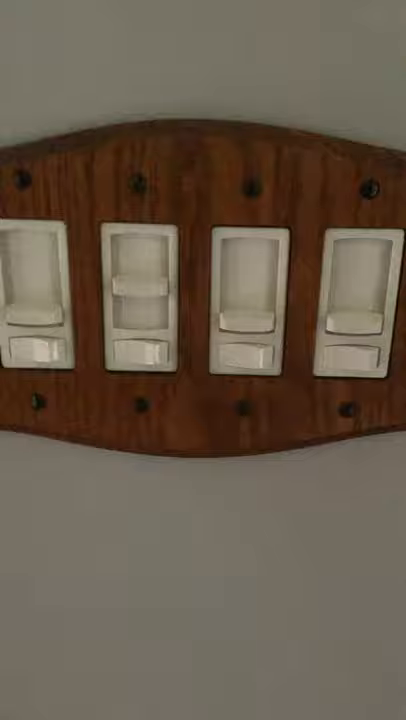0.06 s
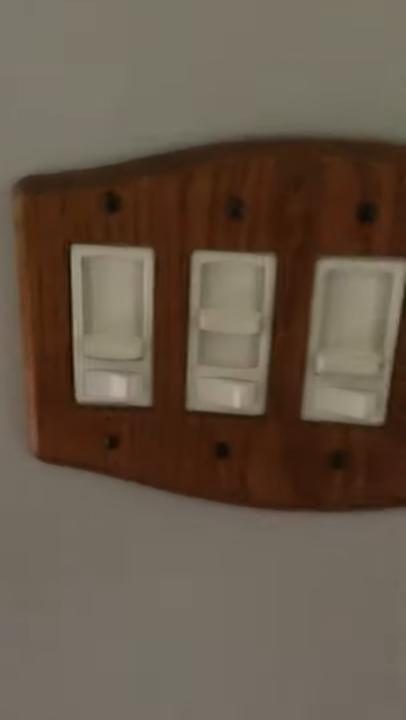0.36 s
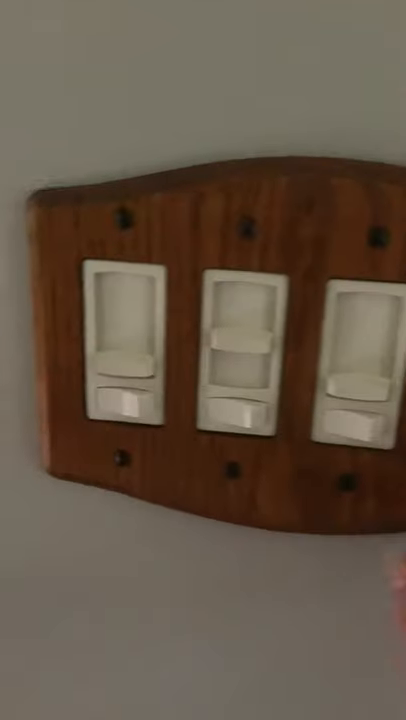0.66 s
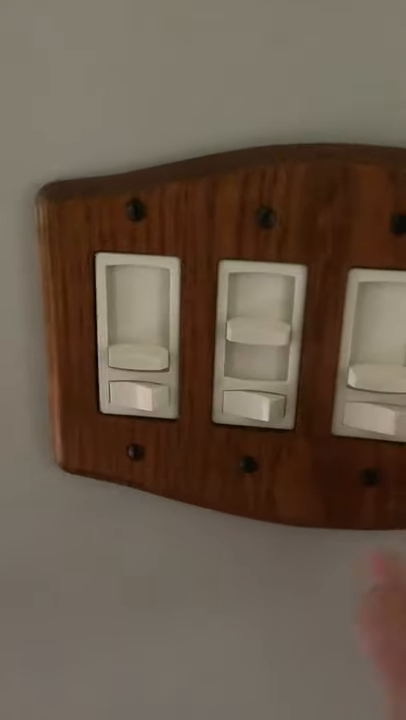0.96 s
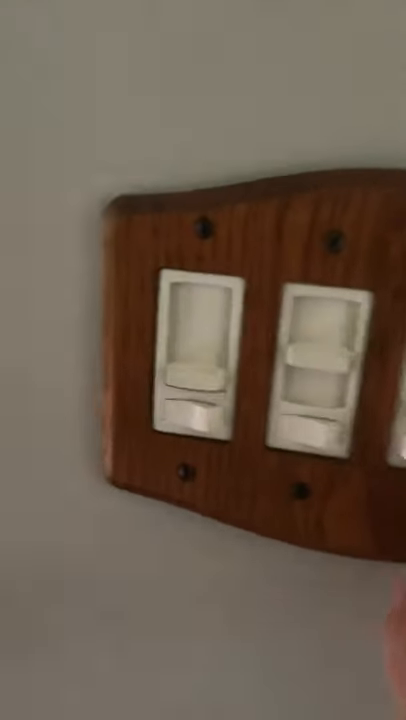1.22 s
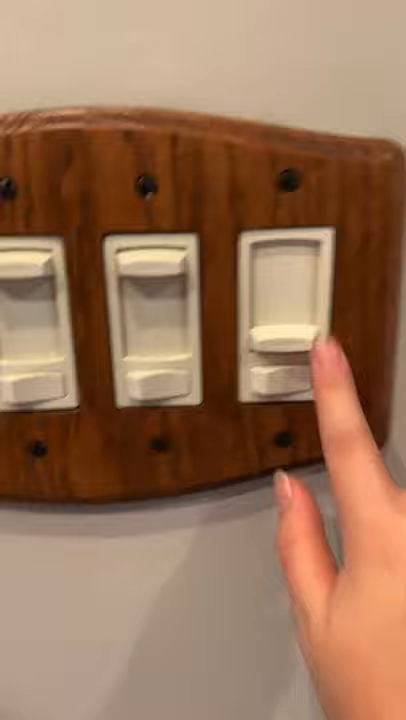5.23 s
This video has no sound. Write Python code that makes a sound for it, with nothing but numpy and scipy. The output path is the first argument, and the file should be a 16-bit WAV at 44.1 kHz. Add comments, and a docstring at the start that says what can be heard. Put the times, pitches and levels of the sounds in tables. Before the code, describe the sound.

Close, sharp clicks of plastic rocker switches, followed by short slider scrapes and clacks, with a low motor hum in the background.

```python
"""A motor throbs low in the background of a small room; then plastic rockers snap, close to the microphone.
A hand works slide dimmers on a wooden wall plate: each snap rings switch, spring and hollow wall,
the sliders scrape along their tracks and hit the end stops, and loose knobs tick under the finger.
The motor picks up speed a little past halfway, and a faint hum comes in with it."""
import sys
import numpy as np
from scipy import signal
from scipy.fft import rfft, irfft
from scipy.io import wavfile

SR = 44100
rng = np.random.default_rng(int(sys.argv[2]) if len(sys.argv) > 2 else 0)


def wrap_up_sound(samples):
    """Save the sound to the file named by the first command line argument, as 16-bit audio."""
    columns = np.atleast_2d(samples).T
    # keep every value between -1 and 1, then stretch to whole-number steps
    tamed = np.clip(columns, -1, 1)
    steps = np.round(tamed * 32767).astype(np.int16)
    wavfile.write(sys.argv[1], SR, steps)


N = 243517
TIME = np.arange(N) / SR
SIZE = 4096  # samples in one contact or body response
BIN_HZ = np.arange(SIZE // 2 + 1) * SR / SIZE

# Levels in the tables are relative, ahead of the plate, the room and the mix.
# rocker snaps: landing_s, level_db, body_db, top_db, ring_hz, ring_db, wall_knock_db, contact_decay_s
ROCKER_SNAPS = [(0.7563, -3, -3.5, -7, 2980, 14.5, -29, 0.0041), (1.1963, -1, 0, 2.5, 1917, 4.5, 5, .0024),
                (1.7774, -15.5, 0, 0.5, 1785, 4, -19.5, .0026),
                (1.985, -8.5, -.5, -1, 5100, 4.5, -31.5, .0036), (2.3384, 2, -2, 1, 12600, 4, -10, .0017),
                (5.3452, -10, -8, -8, 10630, 9, -17.5, 0.0022),
                (5.4123, -12, -8, 0, 3200, 12.5, -23, 0.0047),
                (5.416, -10, -5, -9, 10500, 17.5, -35, 0.0013)]
# rings that every switch shares: pitch_hz, width_hz, gain_db
SWITCH_RESONANCES = [(5150, 640, 5), (10960, 900, 2.5)]
# thin ring of a switch's return spring: pitch_hz, level_db, t60_s
SPRING_RINGS = [(2556, -53, .22), (4380, -54.5, .28), (5730, -57, .33)]
# hollow wall behind the plate: pitch_hz, level_db, t60_s
WALL_RINGS = [(272, -57, .14), (318, -57, .13), (356, -53, .16), (398, -53, .12), (430, -47, .17),
              (482, -54, .12), (535, -51, .16), (764, -53, .13)]
# slider strokes: arrival_s, friction_db, swell_exponent, stop_db, stop_body_db, stop_ring_hz
SLIDER_STROKES = [(3.0958, -43, 0.54, -4.5, -7.5, 14470), (4.083, -45, 1.64, -13, -2, 10700),
                  (4.9312, -43.5, 0.63, -12, -4.5, 4130)]
# colour of sliding friction: frequency_hz, level_db
FRICTION_COLOUR = [(200, -86.5), (1000, 0.5), (2000, 1), (3500, 0.5), (6000, 2), (8500, -1.5), (11000, 6.5),
                   (15000, 3.5)]
# resonances and hollows of a slider in its track: pitch_hz, width_hz, gain_db
TRACK_RESONANCES = [(3460, 330, 10), (4480, 444, 2.5), (5380, 180, 14), (6400, 410, 6.5), (9000, 770, -2.5)]
# light touches on the knobs: start_s, level_db, brightness_db_per_octave, ring_hz
KNOB_TOUCHES = [(.645, -35, -5.5, 3020), (1.0698, -29.5, -2.5, 3260), (1.4917, -29.5, -3, 1700),
                (2.317, -33, 0, 7000), (2.7044, -23.5, .5, 10740), (2.805, -30, 0.5, 4420),
                (2.8339, -27, 2, 6100), (2.8948, -30.5, -0.5, 10500), (2.9657, -35, -5, 2200),
                (3.2397, -32.5, -5, 3360), (3.273, -30.5, 3.5, 10300), (3.279, -20, 0, 10200),
                (3.484, -36.5, 0.5, 10900), (3.5997, -34, 1, 4250), (3.6935, -29, 1.5, 10800),
                (3.9, -28, 1, 10800), (3.909, -29.5, -4, 1500), (4.2141, -33, -2.5, 1570),
                (4.37, -28, -2, 10550), (4.6552, -29.5, -3.5, 4300), (5.0162, -25, -2.5, 2200),
                (5.081, -25, 2, 9400), (5.1565, -22.5, 2.5, 10100), (5.225, -25, 1.5, 10300),
                (5.247, -32.5, -0.5, 4400)]
# colour of a knob: frequency_hz, gain_db
KNOB_COLOUR = [(800, -1), (2300, -1.5), (5000, 3.0), (8300, -4.5), (11000, -1.5), (15000, -6.5)]
# thin ring of a loose knob: pitch_hz, level_db, t60_s
KNOB_RINGS = [(1839, -51, 0.25), (3123, -57.5, 0.16), (3895, -54, 0.17), (4600, -39.5, 0.37)]
# broad colour of the plastic: frequency_hz, gain_db
PLASTIC_COLOUR = [(60, -24), (200, -5.5), (600, -4), (1200, -5.5), (2200, -2), (6000, -0.5), (13000, 3),
                  (16000, -8.5)]
# resonances of switch and plate: pitch_hz, width_hz, gain_db
PLATE_RESONANCES = [(467, 120, 0.5), (889, 50, 6), (1750, 860, 5.5), (2570, 300, 0.5), (3280, 590, 5),
                    (4125, 1300, 2), (4860, 720, 3), (6050, 540, 4.5), (6780, 440, 5.5), (8960, 600, 1),
                    (10410, 820, 5), (12430, 2700, 1), (14400, 1600, 4.5)]
# dull bumps of the hand: start_s, level_db
HAND_BUMPS = [(1.29, -48.5), (1.808, -48), (2.343, -41), (3.12, -46), (3.25, -49), (3.785, -50.5),
              (4.1, -48.5), (4.93, -50.5)]
# colour of their rumble: frequency_hz, level_db
BUMP_COLOUR = [(25, -40.5), (55, -2.5), (95, -2.0), (150, 4.5), (260, -9.5), (600, -50.5), (2000, -82.5)]
# motor harmonics when slow and when fast: harmonic_number, level_db
SLOW_HARMONICS = [(1, -19.5), (2, -16.5), (3, -11), (4, -11.5), (5, 2), (6, -2), (7, -8), (8, -18.5),
                  (9, -11.5), (10, -20), (11, -43), (12, -20), (13, -36), (14, -41)]
FAST_HARMONICS = [(1, -54), (2, -19), (3, -16.5), (4, -12.5), (5, -6.5), (6, 2.5), (7, -7), (8, -20),
                  (9, -20), (10, -26), (11, -23.5), (12, -27.5), (13, -38), (14, -67)]
# room air: frequency_hz, level_db
AIR_COLOUR = [(20, -34.5), (35, -25.5), (55, -0.5), (100, -6.5), (160, 0), (240, 1.5), (400, -6.5),
              (700, -13.5), (1200, -20.5), (1700, -19.5), (2600, -27.5), (5000, -31.5), (10000, -31.5),
              (16000, -37.5)]
# near reflections at the microphone: delay_s, gain
REFLECTIONS = [(.0032, 0.099), (.0058, .3), (0.0114, .13)]
# room decay: frequency_hz, t60_s
TAIL_DECAY = [(150, 0.21), (500, 0.18), (1500, 0.38), (4000, 0.4), (9000, 0.3), (12000, 0.31),
              (15000, 0.26)]
# colour of the room tail: frequency_hz, gain_db
TAIL_COLOUR = [(150, 2), (500, 12), (1500, 4), (4000, -2), (6000, -2.5), (8500, 2), (10500, -3.5),
               (13000, -7), (16000, -2)]


def rocker_snaps():
    """Close by, each rocker snaps over, rings its switch and its spring, and knocks on the hollow wall."""
    out, jolts, knocks = np.zeros((2, N)), np.zeros(N), np.zeros(N)
    for landing_s, level_db, body_db, top_db, ring_hz, ring_db, knock_db, decay_s in ROCKER_SNAPS:
        blow = landing(decay_s)
        start_s = landing_s - SIZE / SR
        add(out, start_s, from_db(level_db) * switch_body(blow, body_db, top_db, ring_hz, ring_db))
        add(jolts, start_s, from_db(level_db) * blow)
        add(knocks, start_s, from_db(knock_db) * blow)
    return out + ringing(jolts, SPRING_RINGS) + ringing(knocks, WALL_RINGS)


def end_stops(decay_s=0.0022, top_db=-2.0, ring_db=7):
    """Every stroke ends with the slider hitting the end of its track."""
    out = np.zeros((2, N))
    for arrival_s, _, _, level_db, body_db, ring_hz in SLIDER_STROKES:
        clack = switch_body(landing(decay_s, lead_db=-21), body_db, top_db, ring_hz, ring_db)
        add(out, arrival_s - SIZE / SR, from_db(level_db) * clack)
    return out


def knob_ticks(decay_s=0.0043, ring_db=8, rattle_db=-8, rattle_s=0.016, rocks=3, ring_on_db=-8):
    """A touched knob rocks in its play and rings on; a nail sounds bright, a fingertip dull."""
    out, jolts = np.zeros((2, N)), np.zeros(N)
    colour_db = at_hz(KNOB_COLOUR, BIN_HZ)
    average_db = np.mean(np.array(KNOB_TOUCHES)[:, 1])
    octaves = np.log2(np.maximum(BIN_HZ, 800) / 4000)  # brightness tilts about 4 kHz
    for start_s, level_db, brightness, ring_hz in KNOB_TOUCHES:
        rattle = sum(np.roll(contact(decay_s), int(lag_s * SR)) for lag_s in rattle_s * rng.random(rocks))
        blow = from_db(level_db) * (contact(decay_s / 2) + from_db(rattle_db) * rattle)
        peak_db = ring_db * bell(ring_hz, width_hz=800)
        add(out, start_s, radiate(blow, colour_db + brightness * octaves, peak_db))
        extra_db = .7 * (level_db - average_db)  # a harder touch puts a larger share into the ring
        add(jolts, start_s, from_db(ring_on_db + extra_db) * blow)
    return out + ringing(jolts, KNOB_RINGS)


def slider_scrapes(stroke_s=0.14, grain_db=3.5, grains_per_s=600):
    """A slider rubs along its track in a dense run of tiny slips, louder as it gathers speed."""
    push, ramp = np.zeros(N), np.linspace(0, 1, int(stroke_s * SR))
    for arrival_s, friction_db, swell, *_ in SLIDER_STROKES:
        add(push, arrival_s - stroke_s, from_db(friction_db) * ramp ** swell)
    slips = rms_one(noise(FRICTION_COLOUR) * from_db(grain_db * drift(grains_per_s)))
    return shaped(push * slips, resonance_db(TRACK_RESONANCES))


def contact(decay_s):
    """Plastic lands in a quickly dying chatter of micro-impacts that holds all frequencies evenly."""
    t = TIME[:SIZE]
    burst = rng.standard_normal(SIZE) * np.exp(-t / decay_s)
    for _ in range(6):  # flatten the spectrum while keeping the burst short
        flat = irfft(np.exp(1j * np.angle(rfft(burst))))
        burst = flat * np.exp(-(t / (4 * decay_s)) ** 4)
    return burst


def landing(decay_s, lead_db=-15):
    """A faint, very short swell of noise leads into the click, SIZE samples in."""
    swell = from_db(lead_db) * contact(min(decay_s, .002))[::-1]
    return np.concatenate([swell, contact(decay_s)])


def switch_body(blow, body_db, top_db, ring_hz, ring_db, bass_db=-4):
    """A blow sounds the shared rings of the switch and one more that belongs to the struck spot."""
    colour_db = at_hz([(500, body_db + bass_db), (2300, body_db), (6000, 0), (12000, top_db)], BIN_HZ)
    peaks_db = resonance_db(SWITCH_RESONANCES) + ring_db * bell(ring_hz, width_hz=650)
    return radiate(blow, colour_db, peaks_db)


def radiate(blow, colour_db, peaks_db, ripple_db=2.6, ripple_step_hz=260):
    """Two rows: the peaky sound beamed at the microphone, and the smoother one spread into the room."""
    # every touch stresses the many small modes of the plastic a little differently
    ripple = np.interp(BIN_HZ / ripple_step_hz, np.arange(SIZE), rng.standard_normal(SIZE))
    beamed = shaped(blow, colour_db + peaks_db + ripple_db * ripple)
    spread = shaped(blow, colour_db + .5 * peaks_db)
    return np.array([beamed, spread])


def ringing(force, modes):
    """Lightly damped modes go on sounding after a blow."""
    t = TIME[:SR // 2]
    ring = sum(from_db(db) * np.exp(-np.log(1000) * t / t60_s) * np.sin(2 * np.pi * hz * t)
               for hz, db, t60_s in modes)
    return signal.fftconvolve(force, ring)[:N]


def plate(force):
    """Switch bodies and wooden plate colour every contact with their damped resonances."""
    return shaped(force, at_hz(PLASTIC_COLOUR, BIN_HZ) + resonance_db(PLATE_RESONANCES))


def hand_bumps(rise_s=0.034):
    """Soft pushes of the hand swell and die as a low rumble."""
    swell = np.zeros(N)
    for start_s, level_db in HAND_BUMPS:
        age = np.maximum(TIME - start_s, 0) / rise_s
        swell += from_db(level_db) * age * np.exp(1 - age)
    return swell * noise(BUMP_COLOUR)


def motor(slow_hz=25.86, fast_hz=28.35, slow_db=-50, fast_db=-52.5, first_knock_s=.025,
          sag_hz=0.68, sag_at_s=3.82, sag_s=0.063):
    """In the background, one dull knock a turn: throbbing harmonics whose balance shifts with speed."""
    sag = sag_hz * np.exp(-((TIME - sag_at_s) / sag_s) ** 2)  # the speed dips once before it settles
    turns_per_s = slow_hz + (fast_hz - slow_hz) * gear() - sag
    turn = np.exp(2j * np.pi * (np.cumsum(turns_per_s) / SR - first_knock_s * turns_per_s[0]))
    fast = gear(lag_s=0.017)  # the tone follows just behind the speed
    slow_tone, fast_tone = [causal(np.array(tone)[:, 1]) for tone in (SLOW_HARMONICS, FAST_HARMONICS)]
    flutter_db = .3 + .8 * fast
    out, harmonic = 0, 1
    for slow_gain, fast_gain in zip(slow_tone, fast_tone):
        harmonic = harmonic * turn
        gain = (1 - fast) * slow_gain + fast * fast_gain
        out = out + np.real(gain * harmonic) * from_db(flutter_db * drift(9))
    return np.sqrt(2) * out * from_db(slow_db + (fast_db - slow_db) * fast)


def gear(lag_s=0, change_at_s=3.3, change_s=0.093):
    """The motor changes gear in one smooth step, from 0 (slow) to 1 (fast)."""
    return .5 + .5 * np.tanh((TIME - change_at_s - lag_s) / change_s)


def hum(pitch_hz=237, level_db=-61, waver_hz=3.0, waver_db=0.5):
    """A faint, wavering hum joins the motor once it runs fast."""
    phase = 2 * np.pi * np.cumsum(pitch_hz + waver_hz * drift(5)) / SR
    return gear() * from_db(level_db + waver_db * drift(5.4)) * np.sin(phase)


def room_air(level_db=-60.5):
    """Room tone: a steady, low rush of air behind everything."""
    return from_db(level_db) * noise(AIR_COLOUR)


def room(beamed, spread, tail_db=-6, build_s=0.0013):
    """The beamed sound reaches the microphone with near reflections; the rest feeds a diffuse tail."""
    t = TIME[:SR // 2]
    near, tail = signal.unit_impulse(len(t)), np.zeros(len(t))
    for delay_s, gain in REFLECTIONS:
        near[int(delay_s * SR)] += gain
    edges_hz = np.geomspace(80, 18000, 24)
    for low, high in zip(edges_hz, edges_hz[1:]):
        hz = np.sqrt(low * high)
        band_pass = signal.butter(2, [low, high], "band", fs=SR, output="sos")
        band = signal.sosfilt(band_pass, rng.standard_normal(len(t)))
        thicken = 1 - np.exp(-t / build_s)
        fade = thicken * np.exp(-np.log(1000) * t / at_hz(TAIL_DECAY, hz))
        tail += from_db(tail_db + at_hz(TAIL_COLOUR, hz)) * band * fade / np.linalg.norm(fade)
    return (signal.fftconvolve(beamed, near) + signal.fftconvolve(spread, tail))[:N]


def from_db(db):
    """Decibels to gain."""
    return 10 ** (np.asarray(db) / 20)


def rms_one(x):
    """Scale to rms 1."""
    return x / np.sqrt(np.mean(x ** 2) + 1e-20)


def at_hz(points, hz):
    """Read a table on a log-frequency axis."""
    known_hz, values = np.transpose(points)
    return np.interp(np.log(np.maximum(hz, 1)), np.log(known_hz), values)


def bell(hz, width_hz):
    """Shape of one resonance, 1 at its centre."""
    return 1 / (1 + (2 * (BIN_HZ - hz) / width_hz) ** 2)


def resonance_db(resonances):
    """Summed peaks and hollows of a body at BIN_HZ."""
    return sum(db * bell(hz, width_hz) for hz, width_hz, db in resonances)


def causal(db):
    """Complex response of a passive body with these gains: it rings only after it is struck."""
    mirrored = np.log(from_db(np.concatenate([db, db[-2:0:-1]])))
    return np.exp(np.conj(signal.hilbert(mirrored)))[:len(db)]


def shaped(x, db):
    """Pass a sound through a body whose gains are given at BIN_HZ."""
    return signal.fftconvolve(x, irfft(causal(db)))[:len(x)]


def noise(colour):
    """Steady noise of a given colour, rms 1."""
    gains = from_db(at_hz(colour, np.arange(N + 1) * SR / (2 * N)))
    return rms_one(irfft(rfft(rng.standard_normal(2 * N)) * gains)[:N])


def drift(steps_per_s):
    """A random wander with a spread of about 1."""
    steps = np.arange(int(steps_per_s * N / SR) + 2)
    return np.interp(TIME * steps_per_s, steps, rng.standard_normal(len(steps)))


def add(track, start_s, sound):
    """Mix a sound in at a given time."""
    start = int(round(start_s * SR))
    track[..., start:start + sound.shape[-1]] += sound[..., :N - start]


def scene(snap_db=5, stop_db=5, tick_db=3.0, scrape_db=-1):
    """One microphone near the wall plate: dimmers in front, motor and room tone behind."""
    beamed, spread = (from_db(snap_db) * rocker_snaps() + from_db(stop_db) * end_stops()
                      + from_db(tick_db) * knob_ticks() + from_db(scrape_db) * slider_scrapes())
    dimmers = room(plate(beamed), plate(spread))
    return (dimmers + hand_bumps() + motor() + hum() + room_air())[None]


def record(dry, low_cut_hz=40, overload=1.1, high_cut_hz=16100):
    """The small microphone loses the deepest bass and rounds the hardest snaps; the top is cut steeply."""
    thinned = signal.sosfilt(signal.butter(2, low_cut_hz, "high", fs=SR, output="sos"), dry)
    rounded = overload * np.tanh(thinned / overload)
    return signal.sosfilt(signal.ellip(10, .2, 80, high_cut_hz, fs=SR, output="sos"), rounded)


dry = scene()
out = record(dry)
wrap_up_sound(out)
```